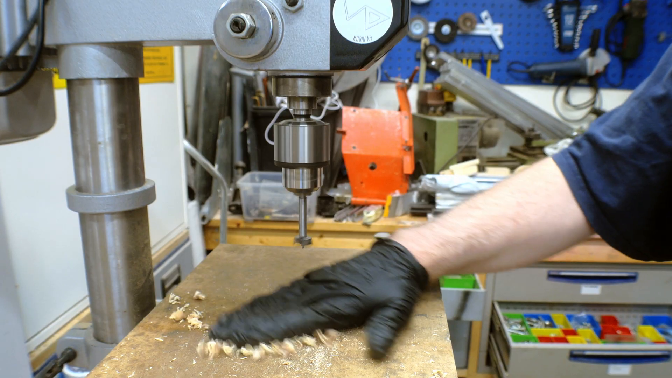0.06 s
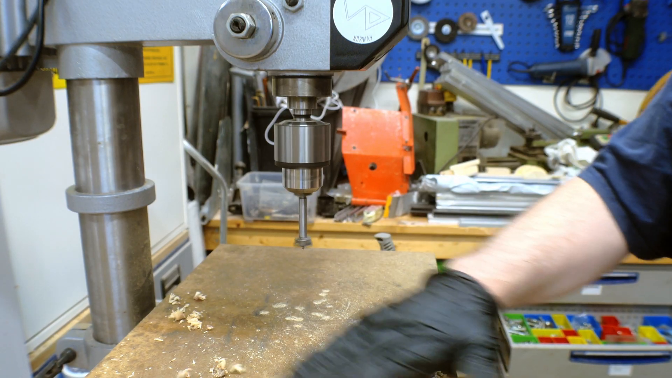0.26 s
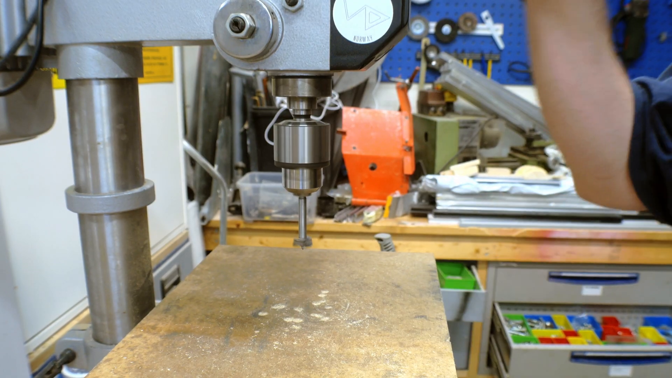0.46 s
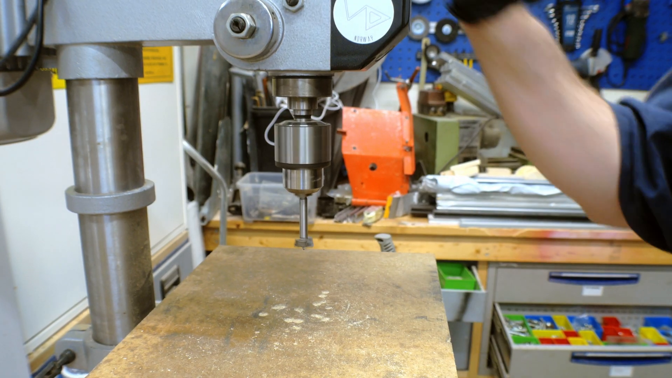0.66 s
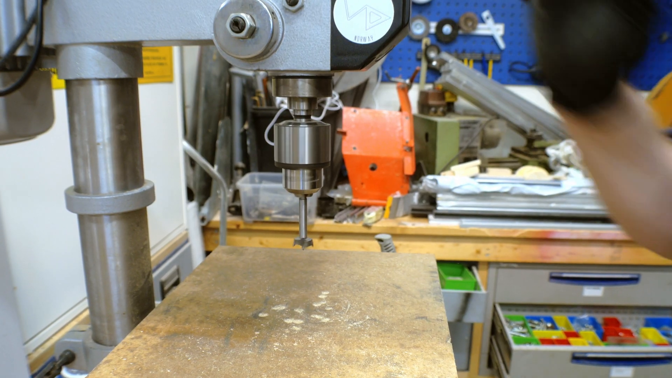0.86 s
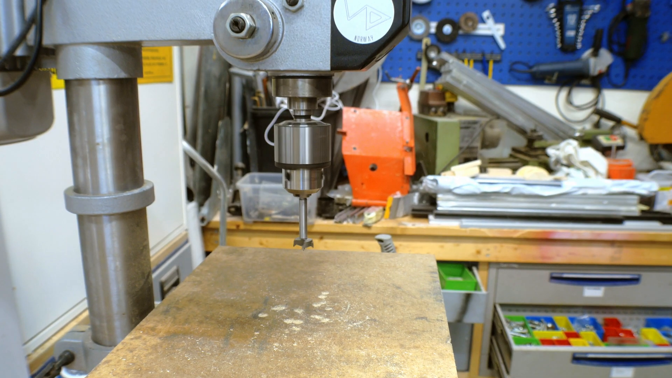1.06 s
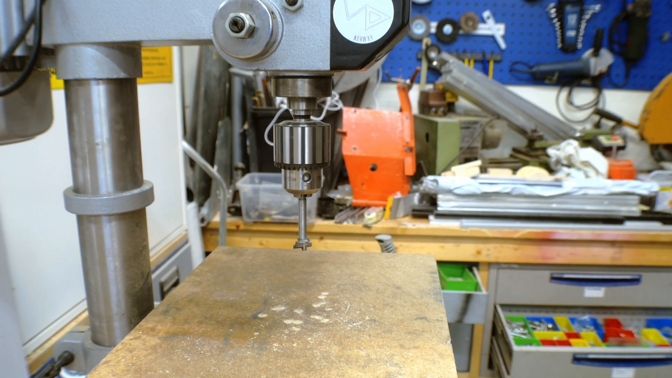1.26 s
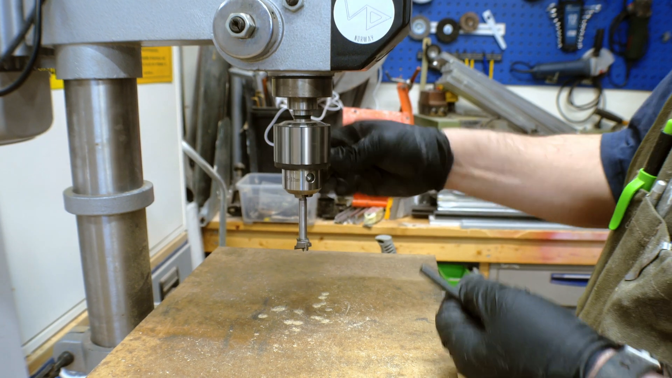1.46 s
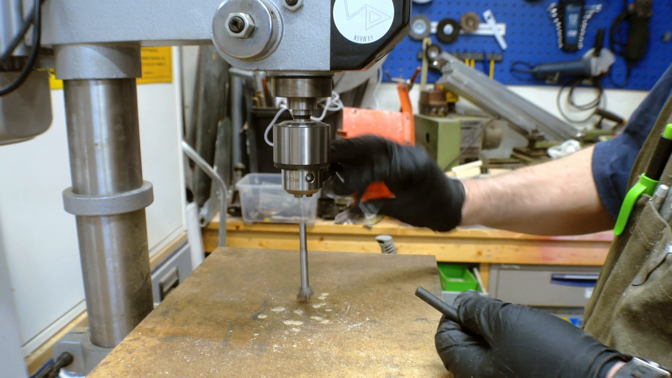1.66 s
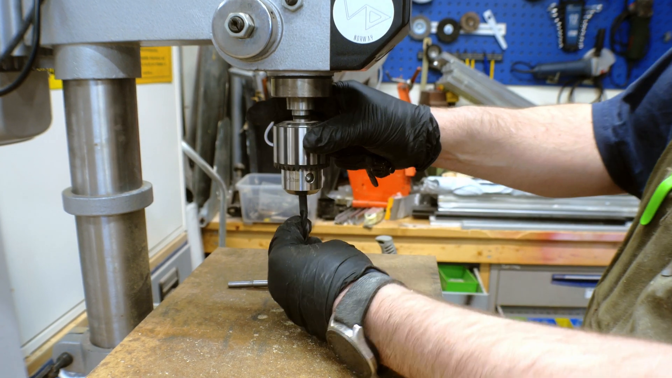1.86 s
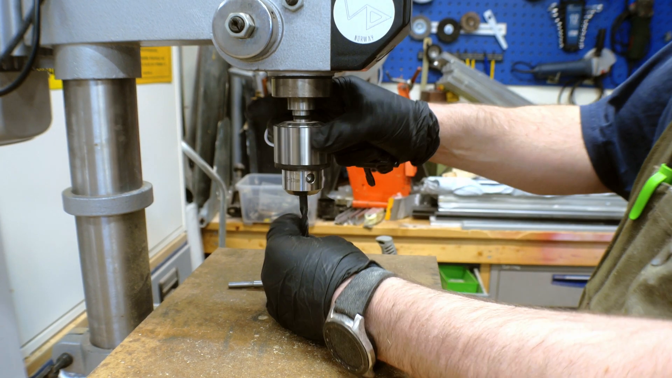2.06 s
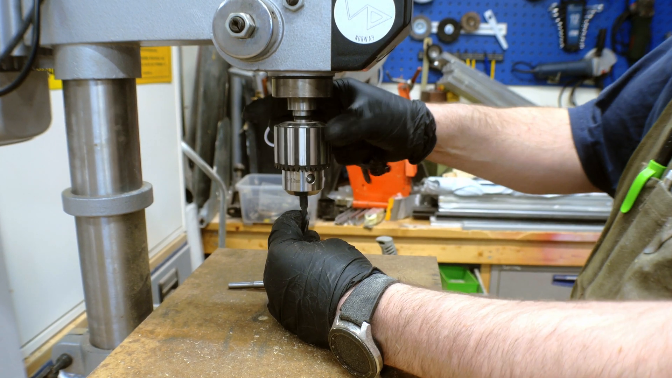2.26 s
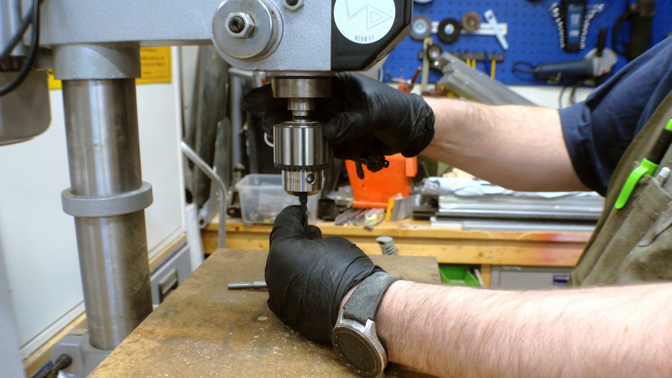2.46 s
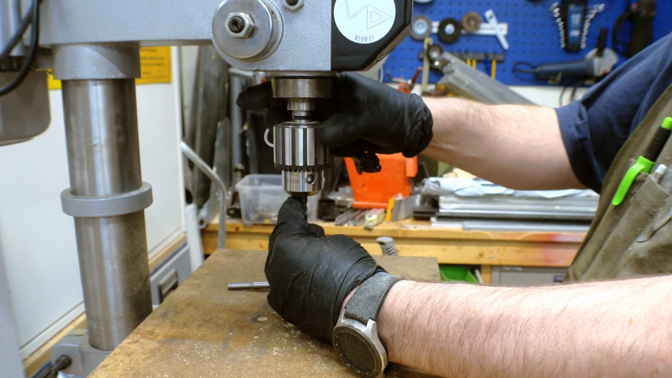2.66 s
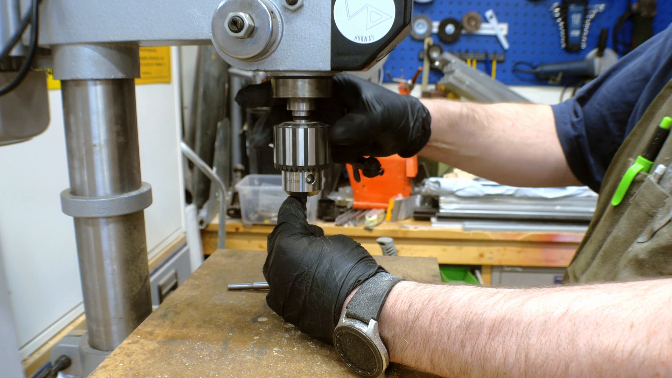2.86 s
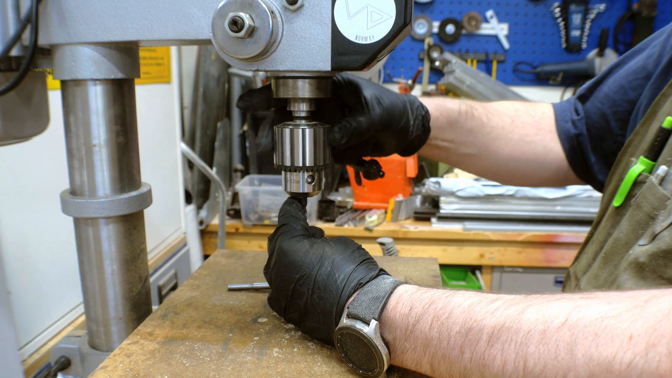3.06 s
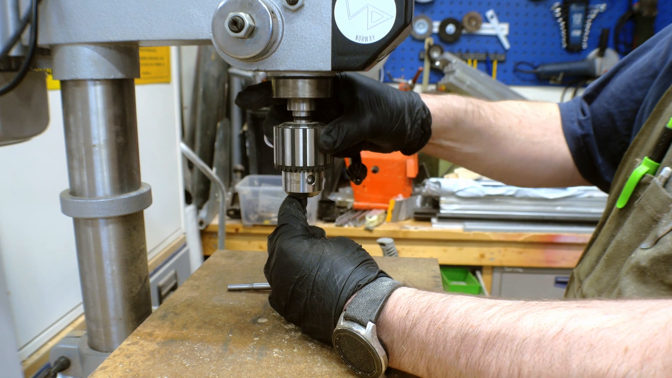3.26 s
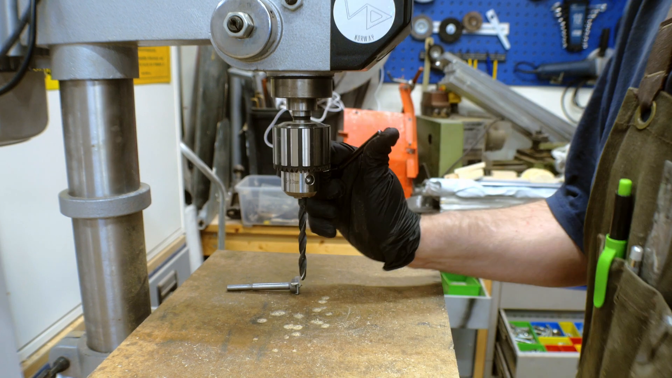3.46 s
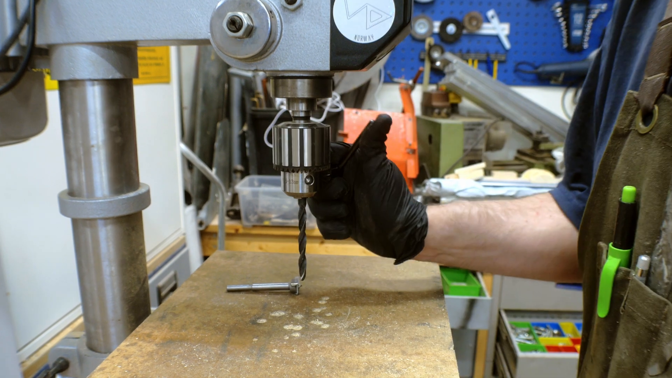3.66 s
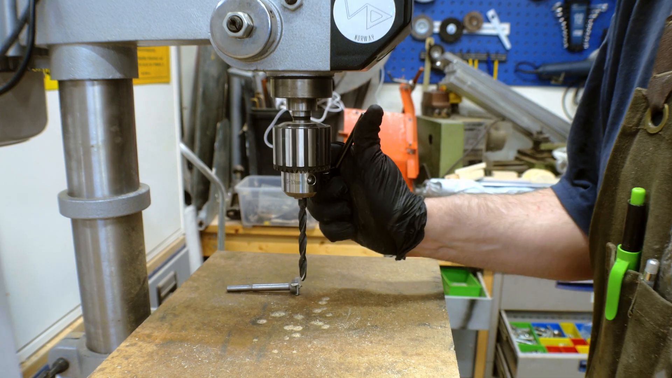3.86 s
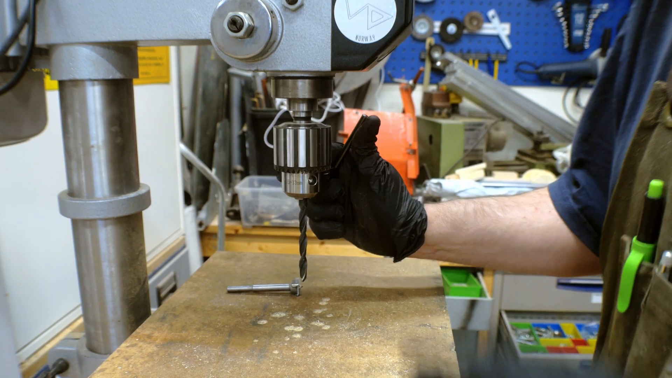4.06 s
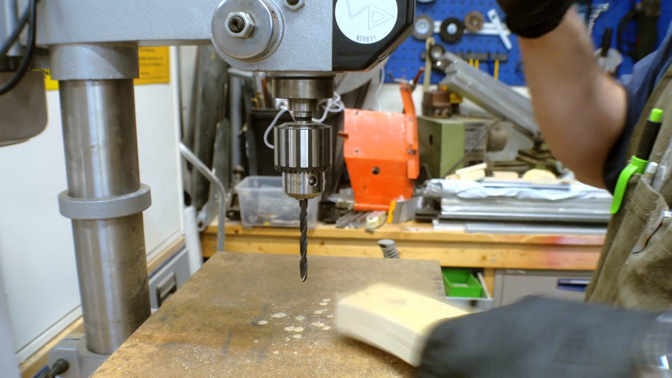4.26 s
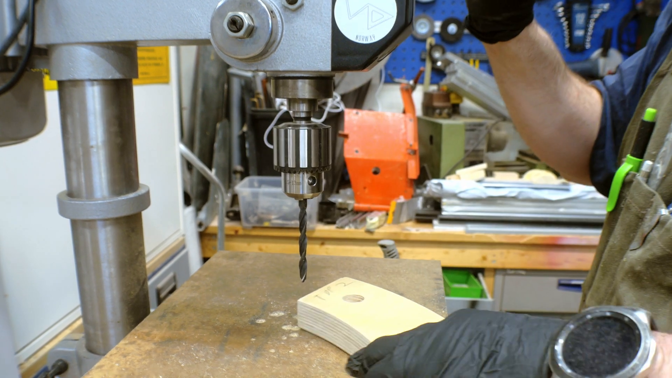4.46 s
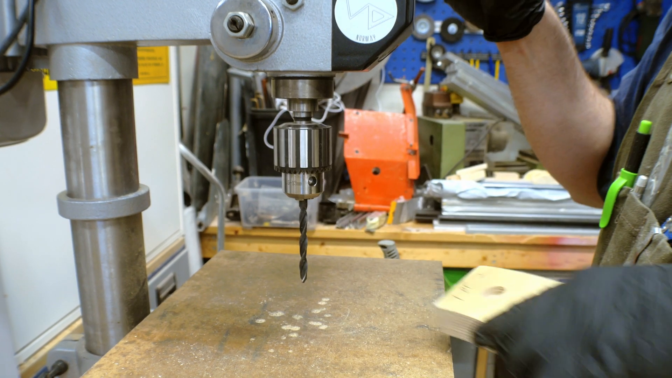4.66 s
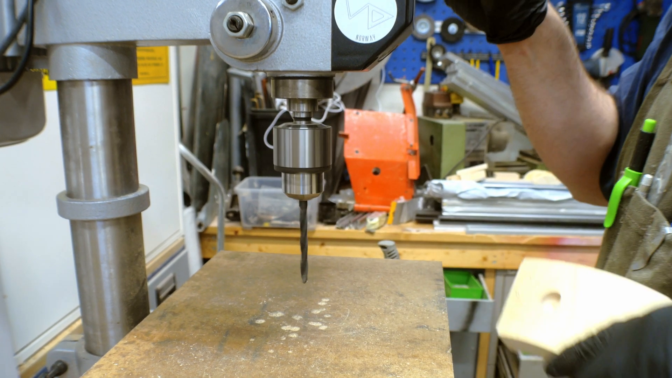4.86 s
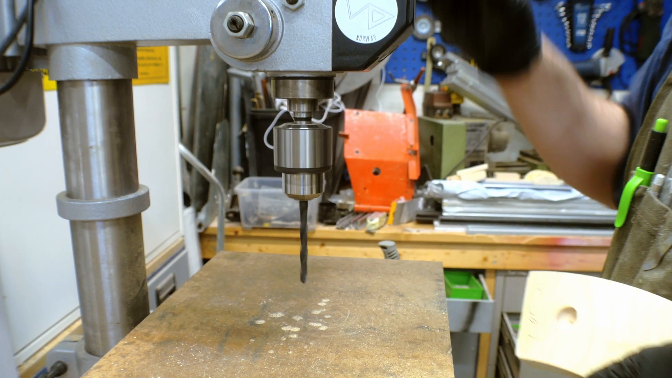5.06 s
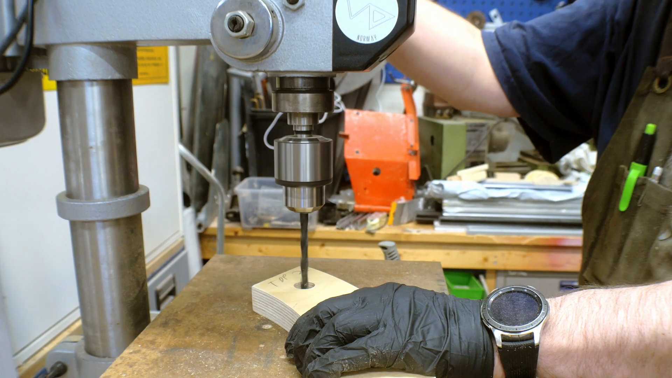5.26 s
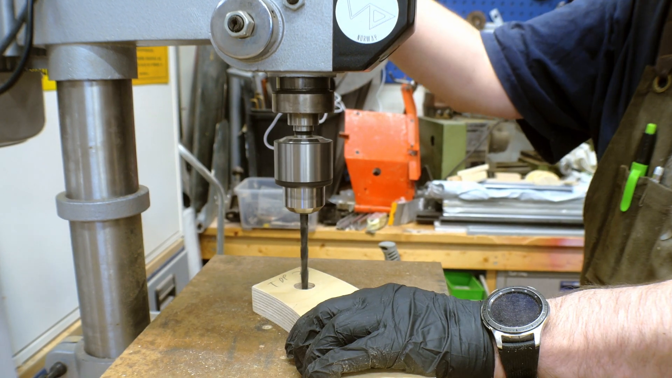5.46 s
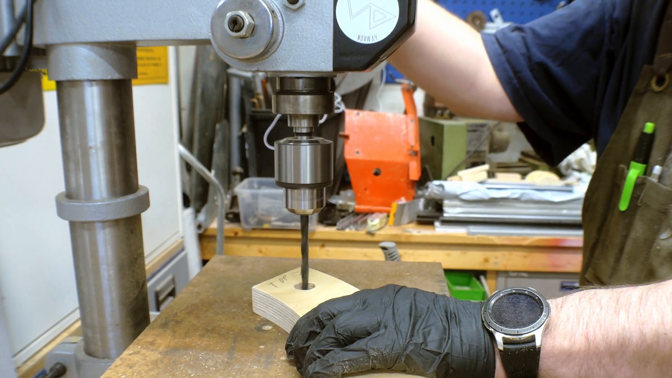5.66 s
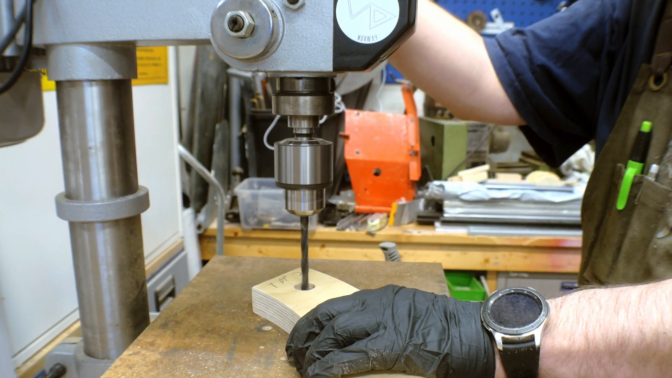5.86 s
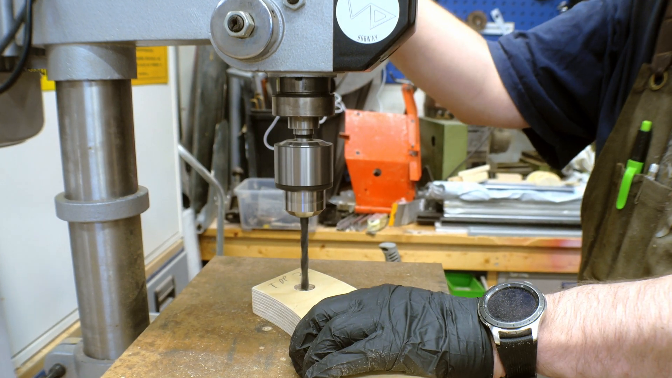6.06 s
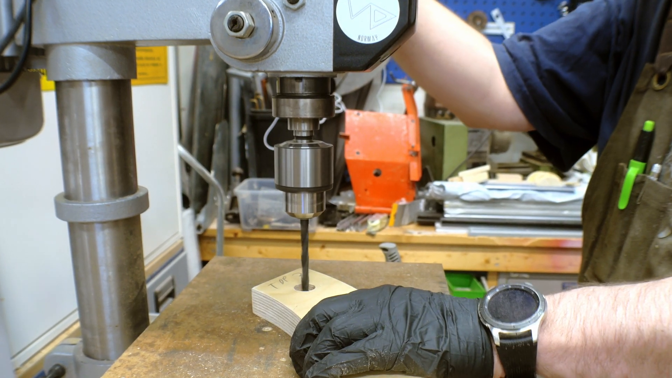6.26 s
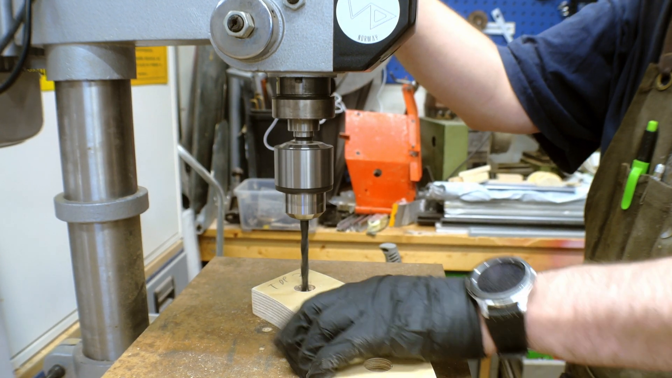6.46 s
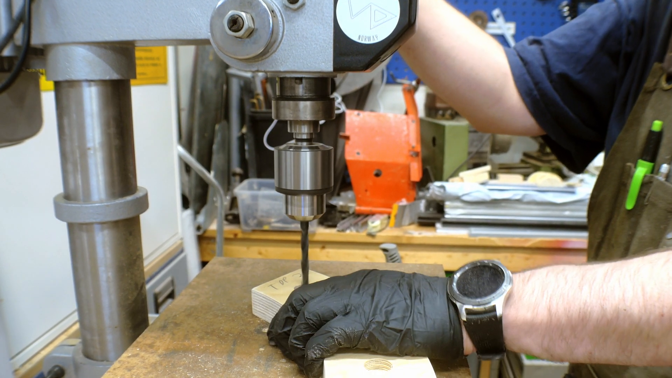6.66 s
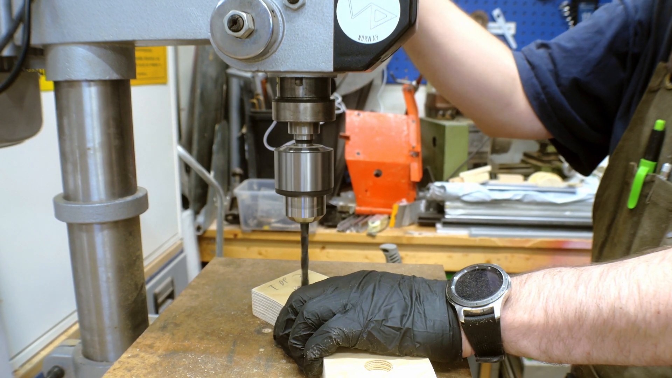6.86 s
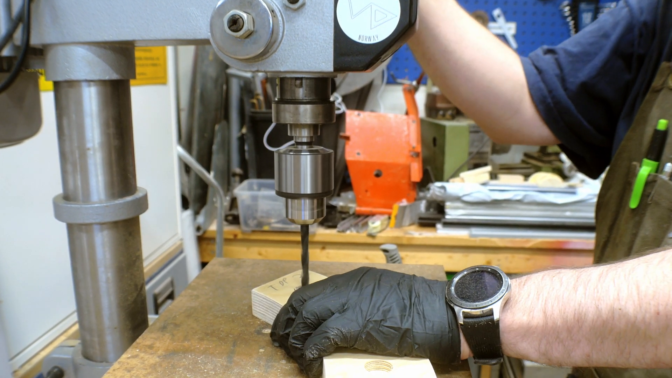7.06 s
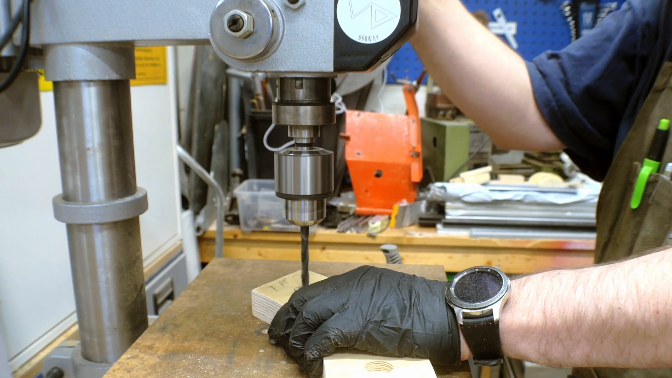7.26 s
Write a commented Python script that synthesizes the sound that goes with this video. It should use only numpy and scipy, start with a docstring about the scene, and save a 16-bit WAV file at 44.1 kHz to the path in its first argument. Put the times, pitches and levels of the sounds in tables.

```python
"""A belt-driven drill press hums, whines and churns while a gloved hand sweeps shavings off its table.
Switched off, its belt squeaks as it stops; gloves rub, the chuck trundles and a dropped bit knocks the table.
A wood block is set down, the motor starts with a belt squeal and the bit enters the wood.
Drive: sines and coloured noise. Spindle rattle: scraped resonances, in bouts once per lap of the belt.
Hits: short impulses and decaying rings. Hands: enveloped noise. Echoes and a quiet air bed lie behind."""
import sys
import numpy as np
from scipy import signal
from scipy.fft import rfft, irfft
from scipy.io import wavfile

SR = 44100
rng = np.random.default_rng(int(sys.argv[2]) if len(sys.argv) > 2 else 0)


def wav_out(sig):
    """Save sig, one row per channel (or a flat mono array), as 16-bit PCM at SR to the path in sys.argv[1]."""
    wavfile.write(sys.argv[1], SR, np.round(np.clip(np.atleast_2d(sig).T, -1, 1) * 32767).astype(np.int16))


N = 323253
T = np.arange(N) / SR

# Mains hum: nominal_hz (snapped to a harmonic below), relative_db
HUM = [(100, -47), (200.1, -29), (300.1, -52), (400.2, -49.5), (500.2, -49.5)]
# Tones of the turning motor: shaft_multiple, relative_db
WHINE = [(10, -53), (12, -45), (22, -54), (28, -52), (34, -63), (38, -51), (40, -53), (50, -52),
         (60, -55.5), (68, -60.5)]
# Spectrum of belt, fan and bearings: freq_hz, gain_db
CHURN_COLOUR = [(25, -38.5), (76, -17), (132, -16.5), (207, -7.5), (300, -3), (370, -12.5), (580, -10.5),
                (650, -17), (850, -17.5), (1300, -19), (2000, -22.5), (3000, -27), (5000, -33),
                (8500, -33.5), (9800, -43.5), (12500, -42.5), (15500, -52)]
# Resonances of belt cover and head: freq_hz, width_hz, gain_db
CASTING = [(303, 25, -4.5), (606, 28, -1), (715, 21, 2.5), (779, 61, -2), (887, 68, -2.5), (1184, 51, 4.5),
           (1676, 54, 3), (2377, 130, -7), (3950, 50, -8.5)]
# Load swelling the churn, surging at the start and as the bit meets the block: time_s, gain_db
LOAD = [(.6, 2), (4.81, -1), (4.89, 10), (4.97, -0.5), (5.43, 2.5), (5.7, 0), (7.33, -1)]
HARMONIC_HZ, SHAFT_HZ = 100.04, 24.87
TONES_DB, TONES_FADE_DB_PER_S, TONES_RISE_S = -2.5, 190, 0.23
CHURN_DB, CHURN_FADE_DB_PER_S, CHURN_RISE_S = -38.5, 44.5, 0.019


def motor(flutter=0.11, wander=0.53, throb_db=2, casting_db=-7, wash_db=-1):
    """Mains hum, wavering shaft tones and irregularly throbbing churn; load makes the casting ring more."""
    hum = 0
    for nominal_hz, db in HUM:
        hz = round(nominal_hz / 100) * HARMONIC_HZ
        hum = hum + amp(db) * np.sin(2 * np.pi * (hz * T + rng.random()))
    hum = hum * (1 + flutter * drift(18))

    whine = 0
    for multiple, db in WHINE:
        strength = amp(db) * (1 + wander * drift(3.8))
        phase = 2 * np.pi * multiple * SHAFT_HZ * T + wander * drift(9)
        whine = whine + strength * np.sin(phase)
    tones_gain = amp(TONES_DB) * powered(TONES_FADE_DB_PER_S, TONES_RISE_S)

    load = level(LOAD)
    casting = amp(casting_db) * resonate(noise(CHURN_COLOUR), CASTING) * np.sqrt(load)
    churn = amp(wash_db) * noise(CHURN_COLOUR) + casting
    throb = amp(throb_db * np.tanh(drift(70)))
    churn_gain = amp(CHURN_DB) * powered(CHURN_FADE_DB_PER_S, CHURN_RISE_S) * load
    return (hum + whine) * tones_gain + unit(churn * throb) * churn_gain


OFF_S, ON_S = 0.59, 4.798


def powered(fade_db_per_s, rise_s):
    """Drive gain: exponential fade after switching off, linear rise after switching on."""
    fading = amp(-fade_db_per_s * np.maximum(T - OFF_S, 0))
    rising = np.clip((T - ON_S) / rise_s, 0, 1)
    return fading + rising


# Spindle resonances: freq_hz, width_hz, gain_db
SPINDLE = [(851, 110, 4), (976.5, 30, 8), (1100, 100, 2), (1187, 110, 2), (1273, 57, -2.5),
           (1537, 83, -0.5), (1980, 130, -18.5), (2410, 210, -11.5), (3740, 110, -4), (3777, 82, -8),
           (4170, 130, -12), (4610, 110, -7), (4695, 92, -13), (5173, 57, -6.5), (5590, 130, -11),
           (6380, 450, -25), (7700, 630, -14.5)]
# Spectrum of the clatter: freq_hz, gain_db
RATTLE_COLOUR = [(200, -18.5), (600, -8), (1200, 5.5), (2200, -24.5), (3000, -14.5), (4200, -5),
                 (6000, -21), (8600, -19.5), (9800, -31), (13000, -28.5), (16000, -41.5)]
# Steady chatter of the running spindle: time_s, force_db
CHATTER = [(.5, -41), (4.85, -35.5), (5.0, -42), (5.4, -41), (5.7, -48.5), (7.33, -47.5)]
CHATTER_FADE_DB_PER_S = 71


def spindle(knocks_per_s=115, unevenness=.3, spread_db=5.0, contact_s=0.0074, ring_db=-2, clatter_db=-8,
            top_hz=7000, head_db=-4, head_t60_s=0.17, head_hz=1500, chatter_rise_s=0.12):
    """The loose spindle chatters in its splines, in bouts as the belt tugs at it."""
    knock_rate = knocks_per_s * np.exp(unevenness * np.tanh(drift(60)))
    knock_phase = np.cumsum(knock_rate) / SR % 1
    chatter = level(CHATTER) * powered(CHATTER_FADE_DB_PER_S, chatter_rise_s)
    force = np.hypot(rattling(), chatter) * unit(amp(spread_db * np.tanh(drift(100))))
    knocks = force * unit(np.exp(-knock_phase / (knocks_per_s * contact_s)))
    # random signs: a scrape of steel on steel
    scrape = knocks * np.sign(rng.standard_normal(N))
    steel = band(resonate(scrape, SPINDLE), top_hz, "low", order=4) * np.std(knocks)
    # low notes hang on in the cast head
    head = band(linger(steel, head_t60_s), head_hz, "low")
    clatter = knocks * noise(RATTLE_COLOUR)
    return amp(ring_db) * steel + amp(head_db) * head + amp(clatter_db) * clatter


# Spells of lap-by-lap tugs: first_tug_s, end_s
RUNS = [(.115, .45), (5.099, 7.33)]
# Tug strength before the swing: time_s, force_db
TUG = [(.11, -32.5), (.28, -33.5), (5.22, -48), (5.35, -27.5), (5.48, -24), (5.62, -28.5), (5.86, -31),
       (6.05, -37), (6.35, -35), (6.55, -30), (6.88, -28.5), (7.14, -43.5)]
# Gaussian width of a bout: time_s, sigma_s
BOUT = [(.3, .02), (5.4, .013), (5.9, .015), (6.25, 0.0085), (7.0, 0.0072), (7.25, 0.025)]
# Further rattles of the spindle, on or between the belt's laps: centre_s, force_db, sigma_s
FURTHER_RATTLES = [(.048, -35.5, .004), (.54, -33.5, .008), (.726, -45.5, .004), (4.887, -25.5, 0.015),
                   (5.06, -34.5, .02), (5.264, -23, .009), (5.403, -22, 0.017), (7.004, -30.5, .0055)]
LAP_S, SWING_DB, SWING_LAPS = .1271, 3, 2.5


def rattling():
    """Spindle force: a bout per belt lap, swinging as belt and pulley shift in step, plus further rattles."""
    bouts = list(FURTHER_RATTLES)
    for first_s, end_s in RUNS:
        for lap, centre_s in enumerate(np.arange(first_s, end_s, LAP_S)):
            swing_db = -SWING_DB * np.cos(2 * np.pi * lap / SWING_LAPS)
            force_db = np.interp(centre_s, *np.transpose(TUG)) + swing_db
            sigma_s = np.interp(centre_s, *np.transpose(BOUT))
            bouts.append((centre_s, force_db, sigma_s))
    return sum(amp(db) * np.exp(-.5 * ((T - centre_s) / sigma_s) ** 2) for centre_s, db, sigma_s in bouts)


# Squeaks of the slipping belt: start_s, length_s, first_hz, last_hz, level_db, overtone_db
SQUEAKS = [(1.086, 0.036, 3980, 3930, -60, -30), (1.138, 0.047, 1250, 1250, -53, -28),
           (1.185, 0.042, 1750, 1636, -65, -25), (1.208, 0.053, 857, 787, -51, -18),
           (1.235, 0.031, 584, 510, -51.5, -12), (1.259, 0.076, 334, 298, -60, -18),
           (4.784, 0.029, 535, 553, -47, -10), (4.807, 0.036, 231, 384, -41.5, -12),
           (4.829, 0.052, 503, 595, -26, -35), (4.854, 0.0235, 631, 737, -28.5, -21),
           (4.925, 0.044, 782, 890, -38.5, -16)]
# Hiss of the belt on coasting pulleys: time_s, level_db
COAST = [(.7, -100), (.76, -47.5), (.88, -55), (.97, -48.5), (1.08, -59), (1.18, -55), (1.28, -53.5),
         (1.37, -66.5), (1.6, -93.5)]
# Hiss spectrum: freq_hz, gain_db
COAST_COLOUR = [(800, -3.5), (2800, -4.5), (3350, -4), (3800, -1), (5300, 0.5), (6100, -10), (7000, -9.5),
                (8200, -2), (10000, -23), (15500, -30)]
# Pulley resonances: freq_hz, width_hz, gain_db
PULLEY = [(3380, 61, 4), (5140, 250, -1.5), (6030, 300, -1), (7960, 420, -8.5)]
# Hiss of the slip as the motor starts: start_s, length_s, level_db
SLIP = (4.855, 0.039, -36)


def belt(waver=0.011, cover_db=-9, cover_t60_s=1.0, hiss_db=-3, pulley_db=-3, flutter_db=2.5):
    """Rubber sticks and slips on the pulleys: gliding two-partial squeaks and fluttering hiss."""
    squeaks = np.zeros(N)
    for start_s, length_s, first_hz, last_hz, db, overtone_db in SQUEAKS:
        count = int(length_s * SR)
        pitch_hz = np.linspace(first_hz, last_hz, count) * (1 + waver * drift(70)[:count])
        phase = 2 * np.pi * np.cumsum(pitch_hz) / SR
        tone = np.sin(phase) + amp(overtone_db) * np.sin(2 * phase)
        add(squeaks, start_s, amp(db) * unit(tone * signal.windows.tukey(count, .7)))
    cover = amp(cover_db) * linger(squeaks, cover_t60_s)
    hiss = amp(hiss_db) * noise(COAST_COLOUR) + amp(pulley_db) * resonate(rng.standard_normal(N), PULLEY)
    hiss = hiss * unit(amp(flutter_db * np.tanh(drift(30))))
    return squeaks + cover + hiss * (level(COAST) + strokes([SLIP]))


# Blows of the dropped bit, then the block: time_s, relative_db, lowpass_hz, ring_db
KNOCKS = [(1.699, -24.5, 3400, -12), (1.7681, -37, 1780, -13), (3.496, -60, 500, -10),
          (4.281, -21.5, 3700, -6), (4.339, -29, 2940, -5), (4.3695, -36.5, 2820, -5),
          (4.386, -44, 2520, -6), (4.402, -42.5, 3520, -6), (4.5596, -31.5, 1180, -12),
          (5.217, -32.5, 250, -5)]
# Thud spectrum: freq_hz, gain_db
KNOCK_COLOUR = [(40, -31.5), (120, -4.5), (280, 1), (520, 6.5), (900, -2.5), (1300, -3.5), (1900, -6),
                (3000, -13), (4200, -12.5), (7000, -22.5), (15000, -21)]
# Modes of the wooden table: nominal_hz, gain_db, t60_s
TABLE = [(150, -17, .09), (280, -8, .1), (506, -1, .11), (650, -7, .07), (815, -10, .08), (900, -12, .09),
         (1168, -19, .05), (1803, -13, .06), (2300, -15, .05), (2654, -17, .05)]
# Modes of the dropped steel bit: nominal_hz, gain_db, t60_s
BIT = [(680, -10, .1), (1066, -4, .15), (1782, 4, 0.052), (2350, 11, 0.088), (2410, 19, .06),
       (5303, -15, .5), (5860, -15, 0.45), (13250, -7, .4)]


def table(thud_db=-2, crunch_db=-6, crunch_t60_s=0.019, bit_db=-40, board_hz=750):
    """Blows on the board: thud, crunch of the surfaces, short ring; each blow has its own low-pass."""
    out = np.zeros(N)
    for time_s, db, lowpass_hz, ring_db in KNOCKS:
        thud = band(disperse(impulse(KNOCK_COLOUR), board_hz), lowpass_hz, "low")
        crunch = linger(band(thud, board_hz, "high"), crunch_t60_s)
        board = band(disperse(ring(TABLE), board_hz), lowpass_hz, "low")
        add(out, time_s, amp(db + thud_db) * blow(thud))
        add(out, time_s, amp(db + crunch_db) * blow(crunch))
        add(out, time_s, amp(db + ring_db) * blow(board))
    bit_drop_s = KNOCKS[0][0]
    add(out, bit_drop_s, amp(bit_db) * blow(ring(BIT)))
    return out


def disperse(x, hz, order=2):
    """Bending waves in a board: all-pass sections delay the tones near hz and 4 hz."""
    for k in range(order):
        b, a = signal.iirpeak(hz * (k + 1) ** 2, 1, SR)
        x = x - 2 * signal.lfilter(b, a, x)
    return x


# Snaps of the switch and its contacts: time_s, level_db, t60_s, highpass_hz
SNAPS = [(0.575, -29.5, 0.023, 1500), (0.5803, -34, 0.016, 700), (.586, -20.5, 0.028, 494),
         (.597, -41, 0.068, 700), (0.895, -32, 0.047, 3580), (.901, -28, 0.12, 3360),
         (0.916, -38.5, 0.14, 2004), (4.798, -29, 0.03, 1573)]
# Snap spectrum: freq_hz, gain_db
SNAP_COLOUR = [(200, -7.5), (600, 4), (1100, 4), (2000, 0.5), (3500, -7.5), (5300, -5), (7000, -12.5),
               (8500, -13), (10500, -20), (14000, -18), (16000, -43.5)]
# Switch housing resonances: freq_hz, width_hz, gain_db
SWITCH = [(1160, 230, 1), (2100, 75, 0.5), (3030, 160, 4), (4950, 260, 0.5), (5390, 95, 7), (5770, 120, -2),
          (8200, 1000, -1.5)]
# Clicks of chuck, bit, fingers and, at 4.798 s, the switch: time_s, level_db, centre_hz, t60_s
TICKS = [(1.5009, -45.5, 1130, 0.11), (1.525, -41.5, 1210, .097), (1.544, -41.5, 1200, .068),
         (1.586, -45, 1340, 0.046), (1.601, -48, 1810, 0.021), (1.633, -54, 5000, 0.021),
         (1.673, -46.5, 1290, .023), (1.678, -55, 8250, 0.019), (1.795, -50, 1160, 0.042),
         (1.877, -54, 1250, .03), (2.174, -57.5, 2750, 0.079), (2.28, -62, 4970, .016),
         (2.311, -52, 1210, 0.031), (2.382, -45.5, 1290, 0.038), (2.381, -52, 5000, .015),
         (3.129, -52, 5900, .025), (3.253, -67, 1300, .057), (3.487, -59.5, 1350, .04),
         (3.698, -66, 5800, .0088), (3.738, -59.5, 1980, .041), (3.914, -61, 2400, 0.015),
         (4.013, -65.5, 5860, .008), (4.223, -59.5, 3000, .013), (4.745, -62, 4960, .015),
         (4.798, -36, 8700, 0.023), (5.163, -34.5, 1220, 0.039), (6.466, -43, 1280, 0.03)]


def clicks(size=8192, spread=1.113, edge_db=-36, housing_db=-3):
    """Switch snaps and small clicks: dense rings modelled as decaying filtered noise."""
    out, t = np.zeros(N), T[:size]
    for time_s, db, t60_s, highpass_hz in SNAPS:
        housing = resonate(noise(SNAP_COLOUR, size), SWITCH)
        snap = noise(SNAP_COLOUR, size) + amp(housing_db) * housing
        snap = band(snap * amp(-60 * t / t60_s), highpass_hz, "high", order=1)
        add(out, time_s, amp(db) * blow(snap))
    for time_s, db, hz, t60_s in TICKS:
        burst = rng.standard_normal(size) * amp(-60 * t / t60_s)
        body = band(burst, [hz / spread, hz * spread], "band", order=1)
        add(out, time_s, amp(db) * blow(body + amp(edge_db) * burst))
    return out


# Chuck turned by hand: start_s, length_s, relative_db
TURNS = [(1.52, .19, -46), (1.72, 0.17, -54.5), (2.05, 0.19, -65.5), (2.31, 0.2, -60.5),
         (2.62, 0.035, -66.5), (2.735, 0.083, -61.5), (3.0, 0.11, -62), (3.25, 0.027, -62),
         (3.43, 0.11, -61), (3.6, .22, -72.5), (3.93, 0.28, -66.5)]
# Block sliding on the table: start_s, length_s, relative_db
SLIDES = [(4.337, 0.084, -44.5), (4.435, 0.063, -52), (4.575, 0.064, -51), (4.74, 0.073, -55)]
# Rubber glove on chuck, bit or block: start_s, length_s, relative_db
RUBS = [(1.51, 0.13, -55.5), (1.89, 0.087, -55.5), (2.15, 0.14, -64), (2.77, 0.084, -63),
        (3.0, 0.11, -62.5), (3.335, 0.023, -61.5), (3.42, 0.032, -63), (3.895, 0.49, -61),
        (4.21, 0.047, -51.5), (4.37, 0.054, -54), (4.505, .035, -48), (4.56, 0.1, -68)]
# Hands staying on the chuck: start_s, length_s
HOLD = (1.5, 2.33)
HOLD_TRUNDLE_DB, HOLD_RUB_DB = -71, -71
# Spindle rumble while spun by hand: start_s, length_s, level_db
SPUN = (1.86, 1.54, -68.5)
# Glove sweeping the table: time_s, level_db
SWEEP = [(0, -52), (.15, -48.5), (.36, -48), (.41, -51.5), (.45, -78), (.5, -100)]
# Spectra: freq_hz, gain_db
TRUNDLE_COLOUR = [(30, -36), (70, -13.5), (150, -17), (210, -4), (310, 3), (400, -7.5), (560, -17.5),
                  (1000, -21.5), (3000, -76.5)]
RUB_COLOUR = [(300, -0.5), (700, -1), (1300, -0.5), (3000, -4), (5000, -4), (8300, -5), (10400, -15),
              (13200, -11), (15500, -17.5)]
SWEEP_COLOUR = [(500, -8.5), (2000, -5.5), (5000, 1.5), (8500, 7.5), (10500, -2), (13500, 1.5), (16000, -6)]
RUMBLE_COLOUR = [(20, -20.5), (38, -11), (55, 7), (70, -4), (100, -19), (300, -70.5)]
# Chuck resonances: freq_hz, width_hz, gain_db
CHUCK = [(660, 300, 5.5), (1042, 120, 7), (1212, 47, 8), (1420, 130, -19), (2110, 350, -7.5)]


def hands(trundle_db=0, chuck_db=-6, rub_db=-2.0, grain_db=3, bump_db=3):
    """Gloves sweep shavings, spin the chuck and rub on bit and block: noise shaped by hand strokes."""
    chuck = resonate(rng.standard_normal(N), CHUCK)
    bearings = amp(trundle_db) * noise(TRUNDLE_COLOUR) + amp(chuck_db) * chuck
    bumps = amp(bump_db * np.tanh(drift(40)))
    trundle = bearings * strokes(TURNS + SLIDES + [(*HOLD, HOLD_TRUNDLE_DB)]) * bumps
    grain = amp(rub_db + grain_db * np.tanh(drift(160)))
    rub = noise(RUB_COLOUR) * strokes(RUBS + [(*HOLD, HOLD_RUB_DB)]) * grain
    sweep = noise(SWEEP_COLOUR) * level(SWEEP)
    rumble = noise(RUMBLE_COLOUR) * strokes([SPUN])
    return trundle + rub + sweep + rumble


STROKE_RISE_S, STROKE_SAG_DB, STROKE_FALL_S = 0.019, -3, 0.018


def strokes(rows):
    """Gain of start_s, length_s, level_db rows: each swells, sags and dies away; powers add."""
    power = np.zeros(N)
    for start_s, length_s, db in rows:
        t = T[:int(length_s * SR) + SR // 2]
        rise = np.minimum(t / STROKE_RISE_S, 1)
        fall = np.exp(-np.maximum(t - length_s, 0) / STROKE_FALL_S)
        add(power, start_s, (rise * fall * amp(db + STROKE_SAG_DB * t / length_s)) ** 2)
    return np.sqrt(power)


# Reverberation: freq_hz, t60_s
ROOM = [(150, 0.41), (500, 0.21), (2000, 0.21), (6000, 0.17), (14000, 0.38)]


def workshop(x, size=24000, first_s=0.0042):
    """Scattered echoes from shelves and walls: sparse random taps with a frequency-dependent decay."""
    taps = rng.standard_normal(size) * (rng.random(size) < .1) * (T[:size] > first_s)
    hz, t, z = signal.stft(taps, SR, nperseg=256)
    decay = amp(-60 * t / read(ROOM, hz)[:, None])
    tail = signal.istft(z * decay, SR, nperseg=256)[1]
    return signal.fftconvolve(x, tail / np.linalg.norm(tail))[:N]


# Spectrum of the still workshop: freq_hz, gain_db
AIR = [(15, -36.5), (25, 6), (169, -20), (552, -18.5), (762, -26), (826, -17), (945, -16.5), (3000, -27),
       (3340, -26.5), (15500, -47)]
AIR_DB = -74.5


def air():
    """Still workshop: steady coloured noise."""
    return amp(AIR_DB) * noise(AIR)


def amp(db):
    """Decibels to gain."""
    return 10 ** (np.asarray(db) / 20)


def unit(x):
    """Scales to rms 1."""
    return x / np.sqrt(np.mean(x ** 2) + 1e-20)


def level(rows):
    """Gain over time from time_s, level_db rows."""
    return amp(np.interp(T, *np.transpose(rows)))


def read(points, hz):
    """Interpolates a table on a log-frequency axis."""
    f, value = np.transpose(points)
    return np.interp(np.log(hz + 1), np.log(f), value)


def noise(colour, size=N):
    """Noise of rms 1 with the given spectrum."""
    gain = amp(read(colour, np.fft.rfftfreq(size, 1 / SR)))
    return unit(irfft(rfft(rng.standard_normal(size)) * gain, size))


def drift(hz):
    """Slow random signal of rms 1, Gaussian roll-off around hz."""
    gain = np.exp(-(np.fft.rfftfreq(N, 1 / SR) / hz) ** 2)
    return unit(irfft(rfft(rng.standard_normal(N)) * gain, N))


def band(x, hz, kind, order=2):
    """Butterworth low-, high- or band-pass."""
    edge_hz = np.clip(hz, 10, SR / 2 - 100)
    return signal.sosfilt(signal.butter(order, edge_hz, kind, fs=SR, output="sos"), x)


def resonate(x, modes):
    """Parallel resonances of freq_hz, width_hz, gain_db; output rms 1."""
    return unit(sum(amp(db) * signal.lfilter(*signal.iirpeak(hz, hz / width_hz, SR), x)
                    for hz, width_hz, db in modes))


def impulse(colour, size=4096):
    """Minimum-phase click with the given spectrum."""
    log_gain = np.log(amp(read(colour, abs(np.fft.fftfreq(size, 1 / SR)))))
    return np.fft.ifft(np.exp(np.conj(signal.hilbert(log_gain)))).real


def ring(modes, size=16384):
    """Dying sines, slightly detuned at each blow."""
    t, out = T[:size], 0
    for nominal_hz, db, t60_s in modes:
        hz = nominal_hz * (1 + 0.0028 * rng.standard_normal())
        out = out + amp(db - 60 * t / t60_s) * np.sin(2 * np.pi * hz * t)
    return out


def blow(x):
    """Scales a hit to the energy of 10 ms at rms 1."""
    return x * np.sqrt(SR / 100 / np.sum(x ** 2))


def linger(x, t60_s):
    """Dense after-ring: convolution with decaying noise of unit energy."""
    tail = rng.standard_normal(SR) * amp(-60 * T[:SR] / t60_s)
    return signal.fftconvolve(x, tail / np.linalg.norm(tail))[:N]


def add(mix, start_s, sound):
    """Adds a sound into the mix in place."""
    part = mix[round(start_s * SR):][:len(sound)]
    part += sound[:len(part)]


def scene(hit_room_db=-8, machine_room_db=-9, side_db=-31):
    """All sources near the centre, with a trace of width from the room."""
    hits, machine = table() + clicks(), spindle() + belt()
    echoes = workshop(amp(hit_room_db) * hits + amp(machine_room_db) * machine)
    mid = hits + machine + echoes + motor() + hands() + air()
    side = amp(side_db) * workshop(mid + 2 * band(mid, 2500, "high"))
    return np.array([mid + side, mid - side])


EDGE_HZ = 15900


def record(dry):
    """Band limit: steep linear-phase low-pass."""
    lowpass = signal.firwin(511, EDGE_HZ, window=("kaiser", 9), fs=SR)
    return signal.oaconvolve(dry, lowpass[None], "same")


dry = scene()
out = record(dry)
wav_out(out)
```